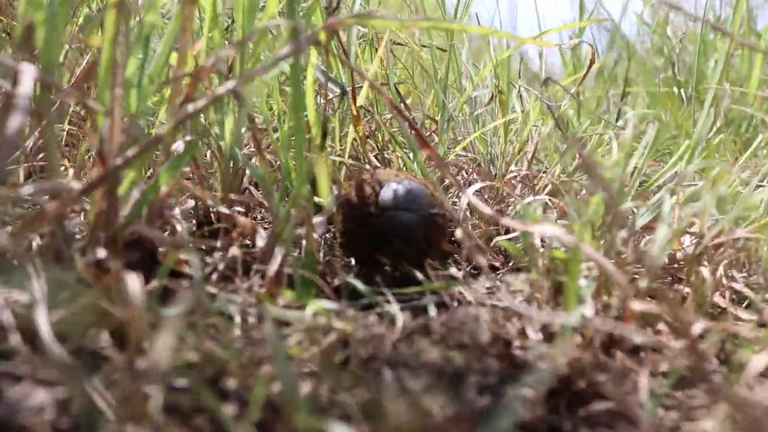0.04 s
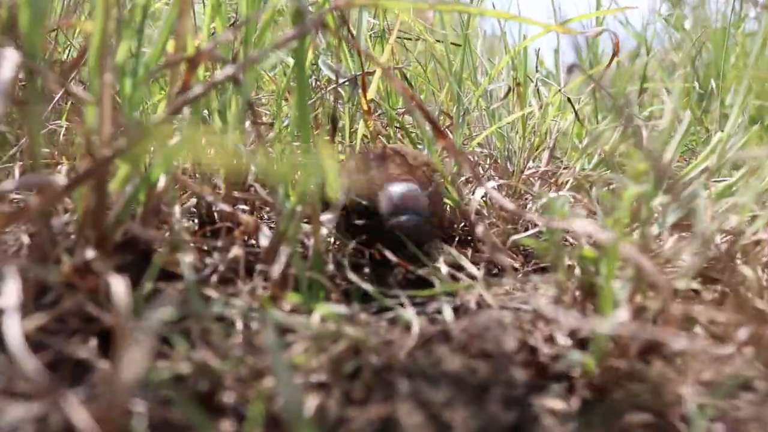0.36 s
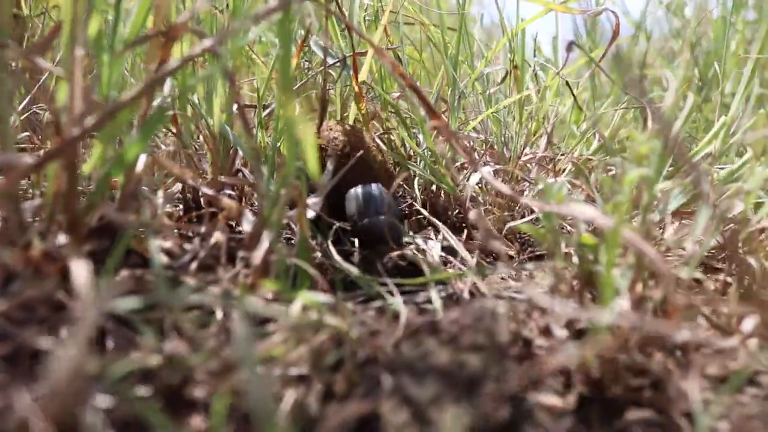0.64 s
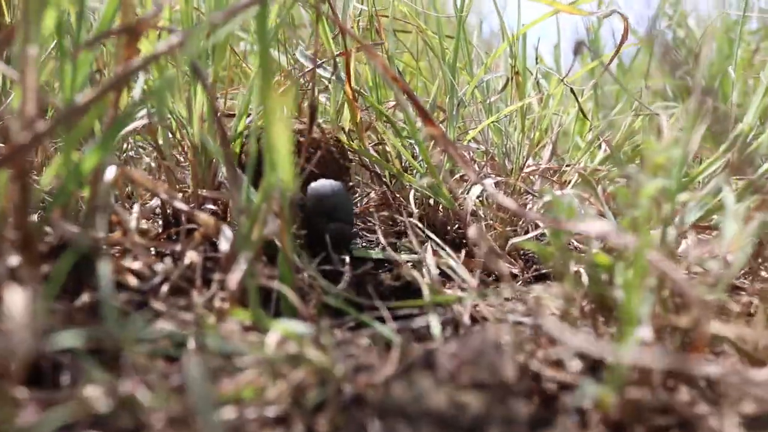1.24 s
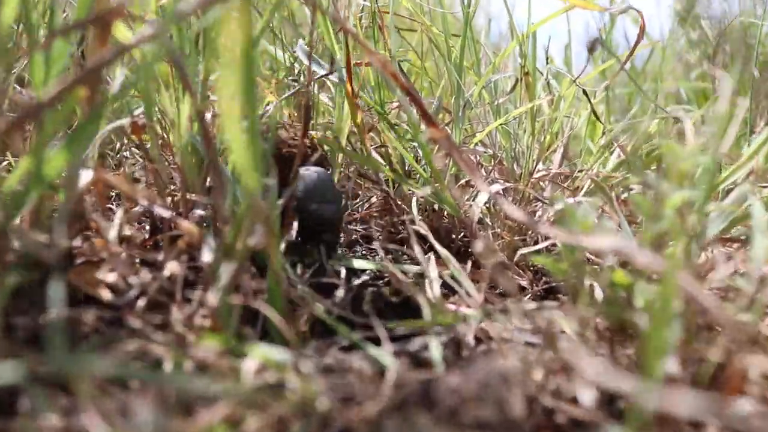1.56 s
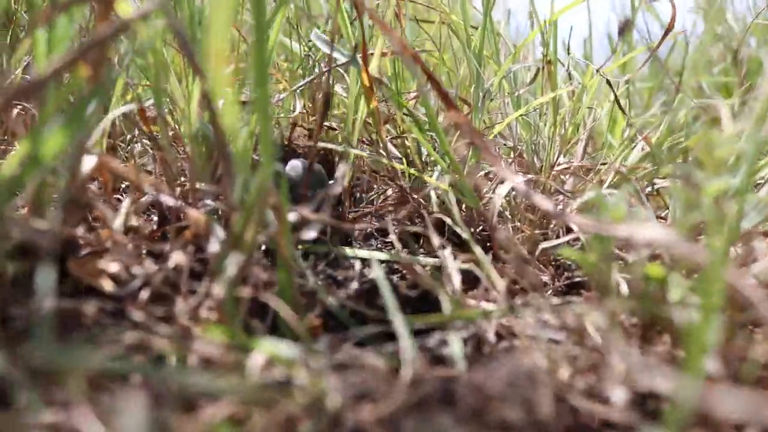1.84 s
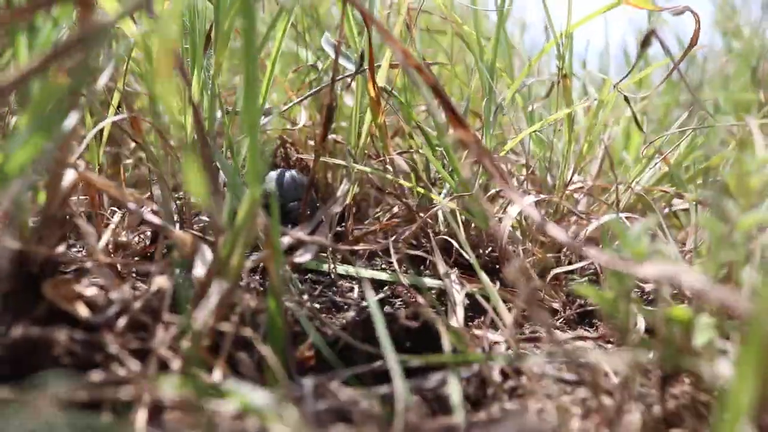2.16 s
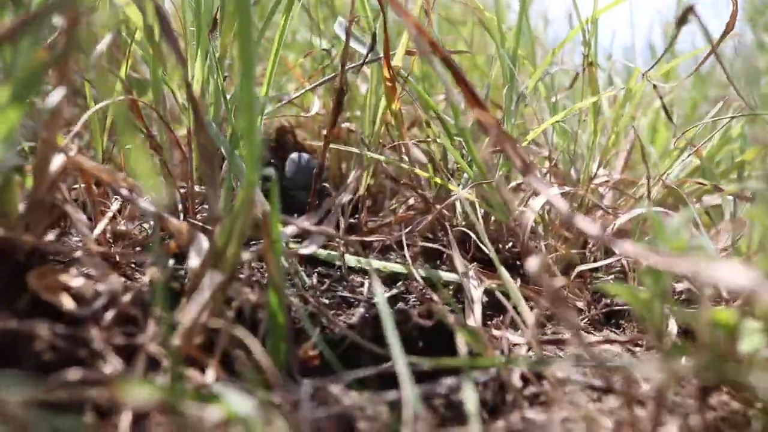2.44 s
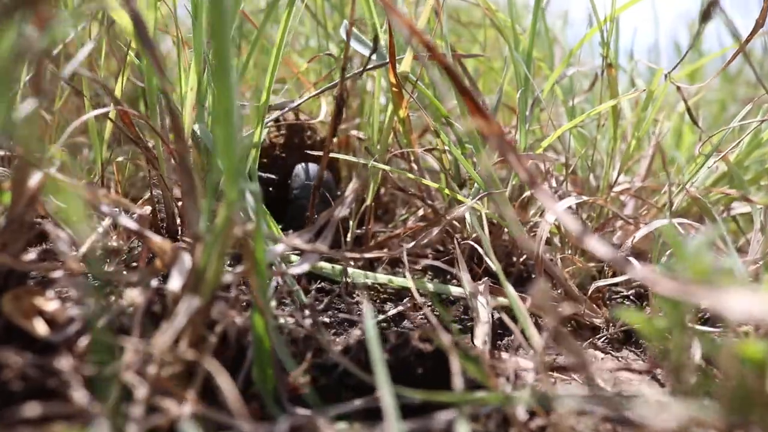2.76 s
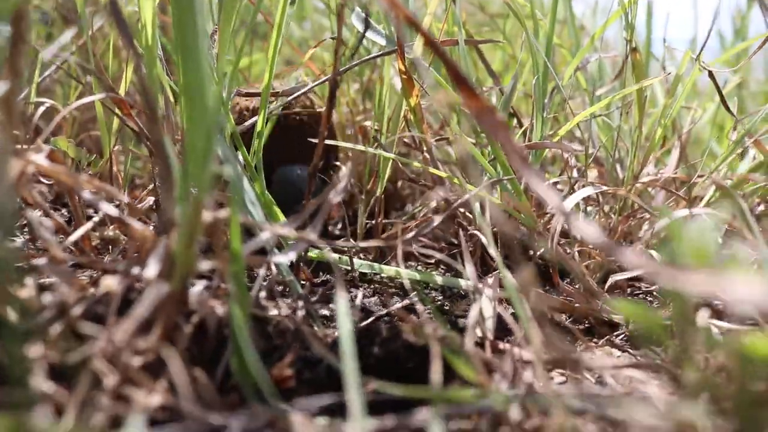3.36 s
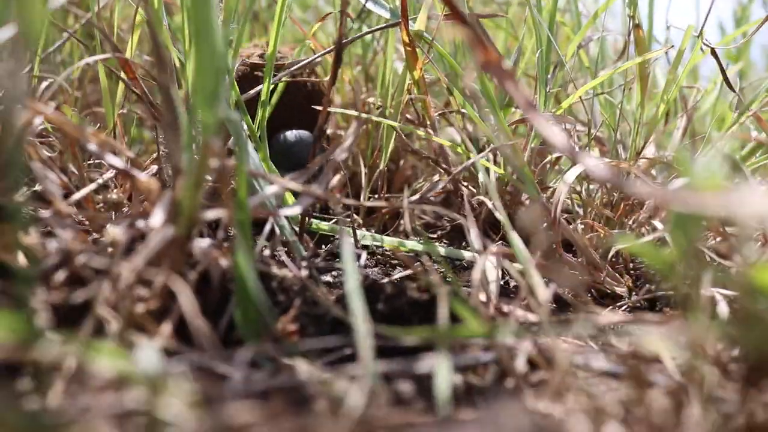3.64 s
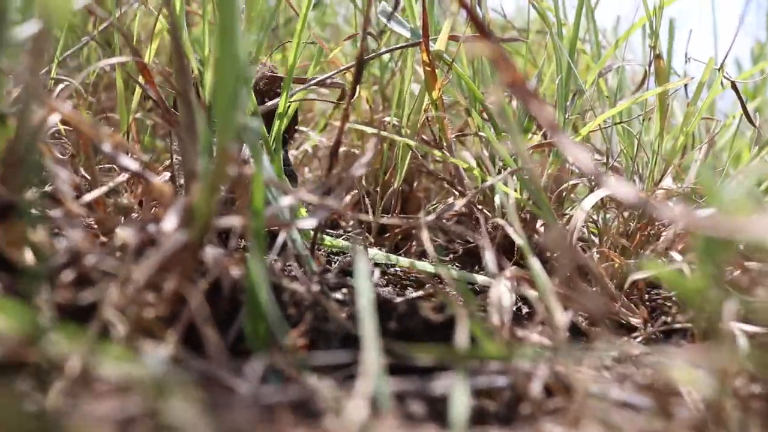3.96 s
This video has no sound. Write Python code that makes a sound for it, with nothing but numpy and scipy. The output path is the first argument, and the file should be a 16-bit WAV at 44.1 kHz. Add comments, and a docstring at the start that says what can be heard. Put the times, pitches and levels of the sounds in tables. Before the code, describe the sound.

Close rustle of dry stems scraping and bumping the microphone, an insect buzzing further off.

```python
"""Low in dry grass

A camera sits low in a field. Right at the microphone, four short harsh rasps ring its housing,
probably something scraping on the body. Close by, stems rustle, snap and bump against it, most
at the end. Further off an insect buzzes in pulses, and birds give a faint call, two falling
chirps and a quick trill, over a soft hiss of open air."""
import sys
import numpy as np
from scipy import signal
from scipy.fft import rfft, irfft
from scipy.io import wavfile
from scipy.ndimage import map_coordinates

SR = 44100
rng = np.random.default_rng(int(sys.argv[2]) if len(sys.argv) > 2 else 0)


def store_wav(level_fs):
    """Save 16-bit WAV to argv[1]."""
    pcm = np.round(np.clip(np.atleast_2d(level_fs), -1, 1) * 32767)
    wavfile.write(sys.argv[1], SR, pcm.T.astype(np.int16))


N = 176400

# scrapes on the camera body: start_s, rise_s, hold_s, fall_s, level_db, treble_db
RASP_STROKES = [(0.466, 0.018, .038, 0.047, -18, -5), (2.054, 0.038, 0.024, 0.044, -17.5, -1.5),
                (2.184, 0.027, 0.034, .042, -19, 1.5), (2.302, 0.025, 0.027, 0.026, -17.5, -4)]
# resonances of the housing: pitch_hz, width_hz, left_db, right_db
HOUSING_MODES = [(154, 77, -14.5, -5), (795, 393.0, -14.5, -12.0), (1206, 180, 2, -5.5), (1645, 160, -5, 5),
                 (1737, 320, 3, -4.5), (2233, 400, -15.5, 4.5), (2630, 270, -0.5, -7),
                 (2700, 186, -56, 10.5), (2930, 210, -19, 6.5), (3800, 960, -6.5, -2.5),
                 (5050, 280, -2, -11), (6450, 3500, -13, -10.5), (9640, 1700, -11.0, -12.5),
                 (12200, 2700, -22, -17)]
# phase of the housing's sound between the two microphone ports: frequency_hz, left_lead_rad
PORT_PHASE = [(200, -1.8), (850, 1), (1150, 2.3), (1800, 1.6), (2300, 9), (2750, 1.5), (3200, 15.5),
              (3800, 9), (4400, 5.5), (5100, 7), (6400, 10)]
# stems striking the camera:
# peak_s, rise_s, decay_s, thud_db, knock_db, crunch_db, stem_ring_db, fizz_db, pan_db
STEM_BUMPS = [(0.077, 0.0014, 0.0029, -23, -26.5, -29, -31.5, -37, -15.5),
              (0.622, 0.0012, 0.0024, -37, -42, -50, -55, -55, 8),
              (0.634, 0.0046, 0.02, -53, -41.5, -38, -38, -32.5, -9),
              (0.854, .003, .005, -56, -59, -36.5, -36, -50, 1),
              (1.029, 0.0082, .005, -42, -52, -39, -37, -54, -1),
              (1.863, 0.0027, 0.021, -46, -47, -36.5, -34.5, -37, -11),
              (1.934, 0.0009, 0.0018, -50, -54, -44, -46, -27.5, -12),
              (2.082, 0.0041, 0.026, -40, -46, -48, -50, -55, 1),
              (2.663, 0.0013, 0.0048, -33, -47, -55, -55, -55, 2),
              (3.090, .005, .006, -55, -44, -40, -52, -55, -5),
              (3.1423, .0008, 0.0029, -39, -25, -40, -43, -48, -13),
              (3.164, .002, 0.0086, -37, -39, -37, -45, -47, -7),
              (3.201, 0.006, 0.0073, -52, -58, -49, -30, -38, -13.5),
              (3.215, 0.0009, 0.0043, -61, -49, -49, -28.5, -43, -14),
              (3.54, 0.00043, 0.0016, -35, -13.5, -19, -25.5, -34, -11),
              (3.549, 0.0023, 0.0078, -47, -32.5, -36, -39, -46, -9),
              (3.583, 0.0013, 0.0071, -34, -31.5, -34, -40, -44, -7),
              (3.609, .003, 0.013, -45, -46, -38, -38, -37, -5),
              (3.660, 0.013, .005, -41.5, -33.5, -27.5, -28, -40, -13.5),
              (3.691, 0.0036, 0.0068, -59, -55, -43, -32, -32.5, -12),
              (3.724, 0.014, 0.015, -58, -61, -47, -33, -31, -12.5),
              (3.875, 0.0028, 0.0065, -55, -50, -29, -25, -30, -3),
              (3.893, 0.0098, .026, -51, -42, -29, -27, -27, -6),
              (3.9308, .003, 0.0014, -17, -19, -12, -17, -26, -4.5),
              (3.94, 0.0053, 0.0052, -44, -27, -22, -28, -33, -1)]
# one spectrum each for thud, knock, crunch, stem ring and fizz: frequency_hz, gain_db
BUMP_SPECTRA = [
    [(40, -26), (130, 0), (400, 7), (800, -20.5)],
    [(220, -10.5), (480, -0.5), (720, 4), (1100, -6), (2000, -28)],
    [(650, -20), (1400, -1.5), (2000, 2.5), (2650, 4.5), (4500, -26)],
    [(1700, -26.5), (2800, -5.5), (3450, 2.5), (4200, -3), (7000, -22)],
    [(2000, -24), (4300, 2), (8000, 5.5), (11500, -7), (16000, -8)],
]
# dry stems snapping close by: peak_s, relative_db, pan_db
STEM_SNAPS = [(0.3826, -15, -4.0), (1.3947, -16, -3.0), (1.5006, -11.5, -8), (1.527, -16, 0),
              (1.6213, -18, -5.0), (1.813, -31, 0), (1.8368, -17, 13), (1.9304, -29, -8.0),
              (2.0622, -13, -13), (2.3227, -12, -8), (2.9454, -19, -3.0), (3.162, -14.5, -14),
              (3.2026, -12.5, -7.5), (3.2826, -17.5, -5), (3.3706, -10.5, -2.0)]
# spectrum of a snap: frequency_hz, gain_db
SNAP_SPECTRUM = [(200, 2), (1500, -5), (4000, -1.5), (9000, 5), (14000, 4), (16000, -5.5)]
# rise and fall of the grass around the microphone: time_s, level_db
RUSTLE_LEVELS = [(0, -42), (.26, -40), (.37, -38), (.6, -37.5), (.76, -37.5), (.92, -40), (1.04, -38.5),
                 (1.13, -45), (1.28, -40), (1.46, -37.5), (1.62, -35), (1.75, -40.5), (1.88, -39.5),
                 (2.0, -35.5), (2.42, -37), (2.52, -39), (2.78, -37.5), (2.95, -39), (2.99, -42),
                 (3.12, -35.5), (3.25, -43.5), (3.34, -43), (3.44, -37), (3.52, -29.5), (3.73, -36),
                 (3.78, -39.5), (3.85, -35.5), (4, -39)]
# spectrum of the massed blades: frequency_hz, gain_db
RUSTLE_SPECTRUM = [(40, -5), (150, 4.5), (400, -1.5), (1000, 3.5), (1700, -1), (2400, 3), (3500, 3),
                   (5000, -0.5), (9000, -3), (11000, -7.5), (15500, -11)]
# spectrum of single blades crackling: frequency_hz, gain_db
CRACKLE_SPECTRUM = [(500, -3), (2500, 4.5), (6000, 5.5), (9300, 15), (11000, -32.5), (13600, 12),
                    (15500, -18.5)]
# insect further off: start_s, length_s, level_db
INSECT_BUZZES = [(0.044, 0.19, -39), (.29, .19, -38.5), (0.578, 0.24, -41.5), (0.87, 0.23, -42),
                 (1.158, .2, -40), (1.415, 0.16, -38), (1.853, 0.4, -44.5), (2.356, 0.14, -46),
                 (2.78, 0.21, -44.5), (3.05, 0.21, -47), (3.366, 0.14, -43.5)]
# the insect's resonance: frequency_hz, gain_db
BUZZ_SPECTRUM = [(3000, -50), (5300, -11), (6100, 0.5), (6600, 2.5), (7600, -4), (8600, -12), (12000, -31)]
# distant falling chirps: start_s, length_s, level_db
CHIRP_NOTES = [(2.598, .058, -34.5), (2.730, .058, -35)]
# course of each chirp: length_fraction, pitch_hz, gain_db
CHIRP_CONTOUR = [(0, 6240, -6), (.2, 5950, -8), (.45, 5150, -2), (.65, 4330, 0), (.85, 3720, 0),
                 (1, 3680, 0)]
# distant trill: start_s, length_s, level_db
TRILL_NOTES = [(2.837, .021, -38), (2.860, 0.018, -32), (2.882, .021, -37), (2.906, 0.0185, -29),
               (2.933, 0.0236, -33.5), (2.961, 0.024, -36)]
# course of each trill note: length_fraction, pitch_hz, gain_db
TRILL_CONTOUR = [(0, 2620, -20), (.3, 2106, -5.5), (.55, 1990, -2.5), (.8, 1800, -7), (0.998, 1690, -16)]
# faint call far across the field: start_s, length_s, level_db
FAR_CALL_SPANS = [(1.29, .37, -42)]
# blurred band of that call: frequency_hz, gain_db
FAR_CALL_SPECTRUM = [(1200, -46), (1700, 1), (2050, -16), (2330, 9), (2650, -7), (3300, -40)]
# hiss of the open field: frequency_hz, gain_db
AIR_SPECTRUM = [(25, -20), (60, -6), (150, -1), (420, -4), (620, -6), (950, -5), (1300, -7.5), (2200, -6),
                (3200, -4), (4300, -6.5), (6200, -11), (8600, -10.5), (11000, -19), (15500, -21)]


def rasps():
    """Scrapes right at the microphone ring the housing; the treble grows faster than the pressure."""
    t, treble_hz = clock(), 3740
    ring = housing(stick_slip())
    treble = irfft(rfft(ring) / (1 + (treble_hz / bins()) ** 8), N)
    out = 0
    for start, rise, hold, fall, db, treble_db in RASP_STROKES:
        release = np.exp(-2.3 * np.maximum(t - start - rise - hold, 0) / fall)
        pressure = np.clip((t - start) / rise, 0, 1) * release
        out += undb(db) * (pressure * (ring - treble) + undb(treble_db) * pressure ** 1.3 * treble)
    return out


def stick_slip():
    """A scraping contact catches and slips in dense clicks that judder and chatter in level."""
    chatter_hz, chatter_db, judder_db = 95, 1.3, 0.8
    chatter = np.sin(2 * np.pi * np.cumsum(chatter_hz * (1 + 0.198 * walk(60))) / SR)
    slips = clicks(per_s=4500, scatter_db=2.7, shared=0.43)
    return slips * undb(judder_db * walk(300) + chatter_db * chatter)


def housing(slips):
    """The housing resonates, wavering a little in pitch, and reaches each port in a different phase."""
    f, modes = bins(), np.array(HOUSING_MODES)
    hz, width, port_db = modes[:, :1], modes[:, 1:2], modes[:, 2:].T
    detuning = (f / hz - hz / f) * hz / width / 1.08
    power = undb(2 * port_db) @ (1 + detuning ** 2) ** -2
    cepstrum = irfft(np.log(power[1]) / 2, N)
    minimum_phase = rfft(2 * cepstrum[:N // 2], N).imag  # the ring follows each click
    left_lead = np.interp(f, *np.array(PORT_PHASE).T)
    phase = minimum_phase + np.array([left_lead, 0 * left_lead])
    ring = unit(irfft(rfft(slips) * np.sqrt(power) * np.exp(1j * phase), N))
    drift = np.cumsum(1 + 0.015 * walk(40))
    return np.array([map_coordinates(side, [drift], mode="mirror") for side in ring])


def bumps():
    """Stems brush up to the camera and strike it: a swell of grains and a short thump of the body."""
    thump_hz, thump_rise_s, thump_decay_s = 203, 0.00091, 0.0052
    t, out = clock(), np.zeros((2, N))
    bands = [colour(clicks(per_s=14000, scatter_db=1.8, shared=0.32), curve) for curve in BUMP_SPECTRA]
    for at, rise, decay, *bands_db, pan_db in STEM_BUMPS:
        near = slice(max(int((at - .1) * SR), 0), int((at + .2) * SR))
        age = t[near] - at
        grains = sum(undb(db) * band[:, near] for db, band in zip(bands_db, bands))
        grains *= spike(age, rise, decay)
        thump = np.sin(2 * np.pi * thump_hz * age) * spike(age, thump_rise_s, thump_decay_s)
        thud_db = bands_db[0]
        out[:, near] += (grains + undb(thud_db - 4) * thump) * pan(pan_db)
    return out


def jolt(start_s=3.942, pitches_hz=(84, 52), decay_s=0.014):
    """The last bump rocks the camera with a brief low wobble."""
    age = np.maximum(clock() - start_s, 0)
    wobble = sum(np.sin(2 * np.pi * hz * age) for hz in pitches_hz)
    return undb(-27) * wobble * np.exp(-age / decay_s) * pan(-9)


def grass(crackles_per_s=110, crackle_decay_s=0.0016):
    """Dry blades rustle around the microphone, reflected by ground and stems; single blades crackle."""
    level = undb(np.interp(clock(), *np.array(RUSTLE_LEVELS).T) + 1.03 * walk(45))
    blades = colour(clicks(per_s=5000, scatter_db=2, shared=0.23), RUSTLE_SPECTRUM)
    rustle = unit(reflections(blades, decay_s=0.0096, db=-2.5))
    breaks = impulses(crackles_per_s, scatter_db=3.5, cap=4)
    grains = signal.lfilter([1], [1, -np.exp(-1 / (crackle_decay_s * SR))], breaks)
    crackle = colour(grains * rng.standard_normal((2, N)), CRACKLE_SPECTRUM)
    return (rustle + undb(-9.5) * crackle) * level * pan(-5)


def snaps(edge_s=0.0017):
    """Dry stems break close by, each a sudden bright burst of noise that dies at once."""
    t, envelope = clock(), 0
    for at, db, pan_db in STEM_SNAPS:
        envelope += undb(db - 8.5) * (t >= at) * np.exp(-abs(t - at) / edge_s) * pan(pan_db)
    return envelope * colour(rng.standard_normal((2, N)), SNAP_SPECTRUM)


def insect():
    """Further off to the right, fine tooth strikes ring a high resonance in repeated buzzes."""
    strikes = clicks(per_s=6000, scatter_db=0.67, shared=0.1)
    return swells(INSECT_BUZZES, edge_s=0.044) * colour(strikes, BUZZ_SPECTRUM) * pan(-4.5)


def bird(notes, contour, pan_db):
    """A distant bird whistles down-slurred notes that share one contour."""
    t, out = clock(), np.zeros(N)
    fraction, hz, gain_db = np.array(contour).T
    waver = 1 + 0.025 * walk(650)
    for start, length, db in notes:
        on = (t > start) & (t < start + length)
        progress = (t[on] - start) / length
        phase = 2 * np.pi * np.cumsum(np.interp(progress, fraction, hz) * waver[on]) / SR
        level = undb(db + np.interp(progress, fraction, gain_db))
        fade = np.minimum(1, 10 * np.minimum(progress, 1 - progress))
        out[on] += np.sqrt(2) * level * fade * np.sin(phase)
    return out * pan(pan_db)


def far_call():
    """A fluttering call, smeared by distance into a band of noise."""
    flutter = undb(4.3 * walk(39.83))
    band = colour(rng.standard_normal((2, N)), FAR_CALL_SPECTRUM)
    return swells(FAR_CALL_SPANS, edge_s=0.02) * flutter * band


def air():
    """Soft steady hiss of the open field."""
    hiss = colour(pair(rng.standard_normal((3, N)), shared=0.13), AIR_SPECTRUM)
    return hiss * undb(-45 + 0.27 * walk(6.22)) * pan(-2)


def reflections(x, decay_s, db):
    """The surroundings add a decaying spray of reflections, different at each port."""
    tail = rng.standard_normal((2, N)) * np.exp(-clock() / decay_s)
    tail /= np.sqrt(np.sum(tail ** 2, axis=1, keepdims=True))
    return x + undb(db) * signal.fftconvolve(x, tail, axes=1)[:, :N]


def impulses(per_s, scatter_db, cap):
    """Randomly timed impulses whose sizes span up to cap times scatter_db."""
    return (rng.random(N) < per_s / SR) * undb(scatter_db * np.minimum(rng.exponential(size=N), cap))


def clicks(per_s, scatter_db, shared):
    """Tiny clicks of random size and sign, reaching both ports at once."""
    return unit(impulses(per_s, scatter_db, cap=3) * pair(np.sign(rng.standard_normal((3, N))), shared))


def swells(rows, edge_s):
    """Envelope of sounds that fade in, hold and fade out."""
    t = clock()
    return sum(undb(db) * np.clip(np.minimum(t - start, start + length - t) / edge_s, 0, 1)
               for start, length, db in rows)


def spike(age, rise_s, decay_s):
    """Exponential rise and decay, peaking at age zero."""
    return np.exp(np.minimum(age / rise_s, -age / decay_s))


def walk(per_s):
    """Smooth random wander with a spread near 1."""
    knots = rng.standard_normal(4096)
    return np.interp(clock() * per_s, np.arange(len(knots)), knots)


def colour(x, spectrum):
    """Filter by a curve of frequency_hz, gain_db, then scale to rms 1."""
    hz, db = np.array(spectrum).T
    return unit(irfft(rfft(x) * undb(np.interp(np.log(bins()), np.log(hz), db)), N))


def pair(three, shared):
    """Left and right from three signals, the first common to both."""
    return np.sqrt(shared) * three[0] + np.sqrt(1 - shared) * three[1:]


def pan(db):
    """Left and right gains; positive db leans left, negative right."""
    return undb(np.array([[db], [-db]]) / 2)


def undb(db):
    """Decibels to gain."""
    return 10 ** (np.asarray(db) / 20)


def unit(x):
    """Scale to rms 1."""
    return x / np.sqrt(np.mean(x ** 2))


def clock():
    """Time of each sample."""
    return np.arange(N) / SR


def bins():
    """Frequency of each spectral bin."""
    return np.maximum(np.arange(N // 2 + 1) * SR / N, 1)


def scene():
    """Contact sounds at the microphone and grass close by, with the field behind blurring the birds."""
    chirps = bird(CHIRP_NOTES, CHIRP_CONTOUR, pan_db=-0.5)
    trill = bird(TRILL_NOTES, TRILL_CONTOUR, pan_db=-5)
    birds = reflections(chirps + trill, decay_s=0.012, db=-6.5)
    return rasps() + bumps() + jolt() + grass() + snaps() + insect() + birds + far_call() + air()


def record(dry, top_hz=16000):
    """The recorder cuts the top treble steeply."""
    return signal.sosfilt(signal.ellip(10, .2, 80, top_hz, fs=SR, output="sos"), dry)


dry = scene()
out = record(dry)
store_wav(out)
```